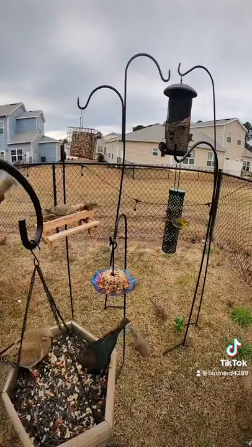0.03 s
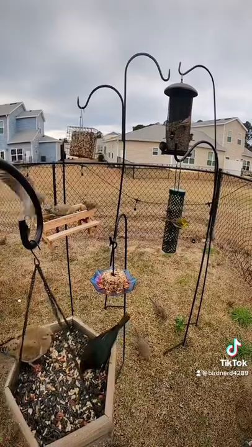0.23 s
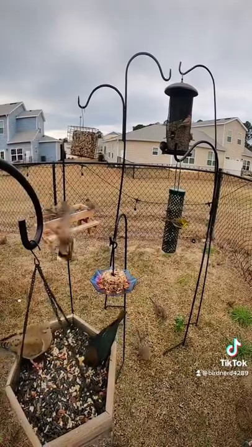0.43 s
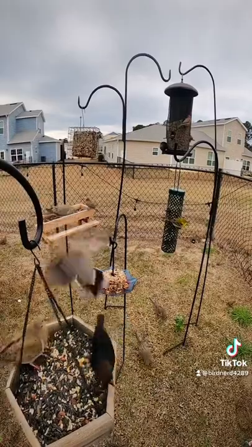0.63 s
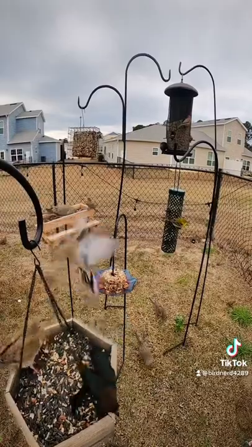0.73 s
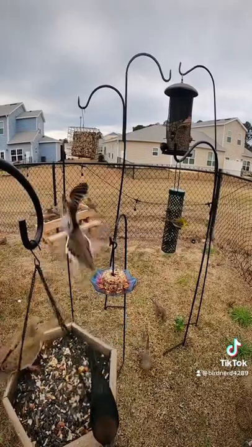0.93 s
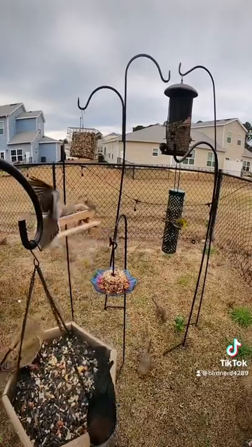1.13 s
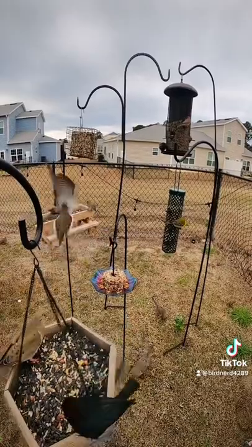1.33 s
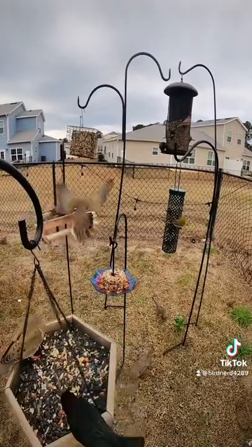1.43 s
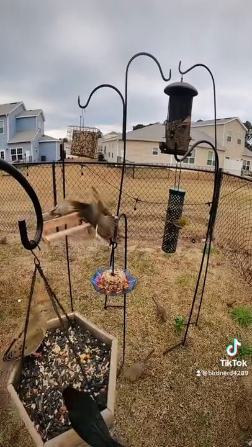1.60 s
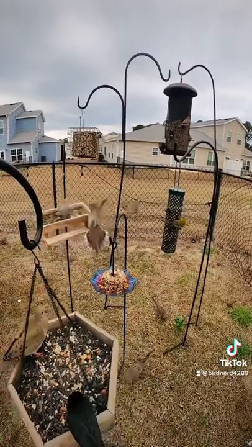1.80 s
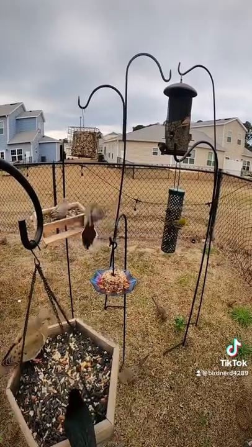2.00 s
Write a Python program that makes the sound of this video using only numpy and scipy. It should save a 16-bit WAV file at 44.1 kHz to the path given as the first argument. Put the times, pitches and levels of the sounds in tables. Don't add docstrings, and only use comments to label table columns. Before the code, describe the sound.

Doves flap close to the microphone at a garden feeder: soft low air puffs, rustling feathers and brief whistles, then sharp wing claps and scratchy claw ticks on wire, over faint distant traffic.

```python
import sys
import numpy as np
from scipy import signal
from scipy.fft import rfft, irfft
from scipy.io import wavfile
from scipy.ndimage import uniform_filter1d

SR = 44100
rng = np.random.default_rng(int(sys.argv[2]) if len(sys.argv) > 2 else 0)


def store_pcm(level_fs):
    pcm = np.round(np.clip(level_fs, -1, 1) * 32767).astype(np.int16)
    wavfile.write(sys.argv[1], SR, np.atleast_2d(pcm).T)


def invert_db(x):
    u = np.asarray(x, float) / 20
    return 10 ** u


N = 90581


def unit(x):
    return x / np.sqrt(np.mean(x ** 2))


def band(x, hz, width_hz):
    centre = min(hz, .45 * SR)
    quality = max(hz / width_hz, .3)
    return signal.lfilter(*signal.iirpeak(centre, quality, fs=SR), x)


def between(x, low_hz, high_hz):
    f = np.fft.rfftfreq(N, 1 / SR)
    return irfft(rfft(x) * (f > low_hz) * (f <= high_hz), N)


def coloured(points, tilt_db=0):
    octave = np.log2(np.maximum(np.fft.rfftfreq(N, 1 / SR), 1))
    hz, db = np.array(points).T
    shape_db = np.interp(octave, np.log2(hz), db, left=-90) + tilt_db * (octave - 11)
    return unit(irfft(rfft(rng.standard_normal(N)) * invert_db(shape_db), N))


def walk(rate):
    k = int(SR / rate)
    steps = np.repeat(rng.standard_normal(N // k + 1), k)
    return unit(uniform_filter1d(uniform_filter1d(steps, k), k)[:N])


def hump(t, start, length, peak):
    u = np.clip((t - start) / length, 0, 1)
    peak = np.clip(peak, .05, .95)
    return np.sin(np.pi / 2 * np.minimum(u / peak, (1 - u) / (1 - peak)))


# (frequency [Hz], density [dB per Hz])
TRAFFIC_SPECTRUM = [(22, 12), (250, -8), (400, -25.5), (740, -24.5), (1200, -19), (1910, -28), (9700, -36),
                    (16000, -35.5)]


def suburb():
    hum = unit(band(rng.standard_normal(N), 135, 14))
    traffic_db = -51.5 + 0.32 * walk(5.5)
    return invert_db(traffic_db) * coloured(TRAFFIC_SPECTRUM) + invert_db(-53) * hum


def voice(t, glide, ratio, db):
    s, hz, level = np.array(glide).T
    pitch = uniform_filter1d(np.interp(t, s, hz), size=60) * ratio * (1 + 0.019 * walk(500))
    phase = 2 * np.pi * np.cumsum(pitch) / SR
    level_db = np.interp(t, s, level, left=-200, right=-200) + db + 2 * walk(400)
    return invert_db(level_db) * (np.sin(phase) + invert_db(-16) * np.sin(2 * phase))


# (time [s], frequency [Hz], level [dB])
CHIRP_GLIDE = [
    (1.941, 3120, -60),
    (1.95, 3420, -57),
    (1.962, 3800, -51.5),
    (1.966, 4350, -49),
    (1.973, 3640, -49.5),
    (1.993, 3580, -54),
    (1.995, 3530, -77),
]
# (time [s], frequency [Hz], level [dB])
PEEP_GLIDE = [
    (0.093, 6160, -82.5),
    (.099, 6900, -54),
    (.108, 7900, -55),
    (.114, 8130, -54),
    (.125, 8200, -82),
]


def small_bird(t):
    chirp = voice(t, CHIRP_GLIDE, 0.99, 0) + voice(t, CHIRP_GLIDE, 1.2, -1.5)
    return chirp + voice(t, PEEP_GLIDE, 0.98, 0)


# (time
# [s], peak level [dB], centre frequency [Hz])
DRY_TICKS = [(0.141, -52, 6000), (0.36, -42, 6400), (0.418, -53, 5500), (0.483, -52, 9500),
             (0.789, -41, 9000), (0.815, -35.5, 10400), (.887, -39.5, 10000), (0.939, -41, 4930),
             (1.339, -51, 4970), (1.373, -39, 4030), (1.453, -37, 6000), (1.795, -39, 9000),
             (1.803, -48, 9500), (1.890, -43.5, 7300), (1.995, -56, 9500)]


def ticks(t):
    air, decay_s = rng.standard_normal(N), 0.0012
    out = np.zeros(N)
    for s, db, hz in DRY_TICKS:
        decay = (t >= s) * np.exp(-np.abs(t - s) / decay_s)
        out += invert_db(db - 1.5) * decay * unit(band(air, hz, 0.37 * hz))
    return out


# (time [s], peak level [dB], level of bright modes [dB], scrape decay [s])
CLAW_HITS = [
    (1.66, -41.5, -1.5, 0.0035),
    (1.684, -40, -7, 0.0047),
    (1.711, -40.5, -7, 0.0051),
    (1.751, -50, 1, 0.0054),
    (1.754, -51.5, 11.5, .004),
    (1.762, -47, 15, .004),
    (1.801, -46, -4, 0.0036),
    (1.845, -54, 8.5, 0.0024),
    (1.997, -36, -5, .002),
]
# (frequency [Hz], level [dB], decay by 60 dB [s])
BASKET_MODES = [(2550, -4, .016), (3950, -1, .022), (5830, -6, .013), (7590, -12, .01), (8490, -3, .012),
                (10500, -9, .009)]


def wire(t):
    out, air = np.zeros(N), rng.standard_normal(N)
    spots = rng.standard_normal((len(CLAW_HITS), len(BASKET_MODES), 2))
    for (s, db, bright_db, scrape_s), spot in zip(CLAW_HITS, spots):
        i = slice(int(s * SR), int((s + .08) * SR))
        push = invert_db(db) * np.exp(-(t[i] - s) / scrape_s) * air[i]
        for (hz, mode_db, t60), (detune, weight) in zip(BASKET_MODES, spot):
            turn = 2j * np.pi * hz * (1 + 0.016 * detune) / SR
            pole = np.exp(turn - np.log(1000) / (t60 * SR))
            ring = invert_db(mode_db - 26 + 2 * weight) * signal.lfilter([1], [1, -pole], push).imag
            scratch = invert_db(-4.5) * band(push, hz, 1600)
            out[i] += invert_db(bright_db * (hz > 5000)) * (ring + scratch)
    return out


# (time [s], peak level [dB], centre frequency [Hz])
WING_CLAPS = [(0.08, -38, 1730), (0.188, -46, 3000), (.275, -40.5, 1490), (1.098, -53, 3000),
              (1.126, -49, 1090), (0.761, -29, 154), (.852, -35, 405), (.741, -34, 2980),
              (0.773, -38, 2580), (0.849, -44, 1970), (1.3808, -23, 1750), (1.4618, -26, 1800),
              (1.5325, -21.5, 1700), (1.607, -35, 2400), (1.428, -47, 1320), (1.485, -44, 1490),
              (1.521, -43, 1730), (1.562, -38.5, 1190), (1.567, -33.5, 298), (1.6007, -45.5, 1840),
              (1.634, -36, 280), (1.643, -40, 400), (1.681, -36.5, 1420), (1.692, -38.5, 1010),
              (1.707, -36.5, 1690), (1.715, -37.5, 346), (1.724, -47, 1200), (1.698, -42.5, 218),
              (1.729, -42, 250)]


def claps(t):
    clap_s, after_s, after_db = 0.0013, 0.006, -10
    out = np.zeros(N)
    air, hiss = (rng.standard_normal(N) * invert_db(5.5 * walk(2500)) for _ in range(2))
    top = unit(band(hiss, 4000, 12000))
    cups = rng.uniform(0.74, 1.024, (len(WING_CLAPS), 2))
    for (s, db, hz), (low_cup, high_cup) in zip(WING_CLAPS, cups):
        body = band(air, hz, hz)
        body += 1.25 * band(air, hz * low_cup, 0.23 * hz)
        body -= 0.52 * band(air, 2.67 * hz * high_cup, 0.19 * hz)
        body = unit(body)
        high = invert_db(-5) * min(hz / 1900, 1) ** 2 * top
        first = np.exp(-np.abs(t - s) / clap_s)
        second = invert_db(after_db) * np.exp(-np.abs(t - s - after_s) / (1.5 * clap_s))
        out += invert_db(db - 3) * (first * (body + high) + second * (body + 0.57 * high))
    return out


# (frequency [Hz], density [dB per Hz])
FEATHER_SPECTRUM = [(150, -9), (350, -21.5), (745, -24.5), (1720, -21), (6640, -37), (8800, -34.5),
                    (13200, -53), (16000, -74)]
# (start [s], length [s], level [dB], tilt [dB per octave])
STROKE_RUSTLES = [(-.02, 0.1, -56.5, 1), (0.064, 0.074, -49.5, -1), (0.133, 0.071, -49.5, -0.5),
                  (0.218, 0.07, -54, 1.5), (0.363, 0.066, -51.5, 2), (0.427, 0.088, -49, -0.5),
                  (0.518, 0.094, -52, 0), (0.61, 0.1, -55, 2), (0.698, 0.091, -42, -1),
                  (0.768, 0.074, -43.5, -1), (0.837, 0.093, -44.5, -1), (0.932, 0.071, -55, 2.5),
                  (1.007, 0.031, -60, 1), (1.045, 0.075, -60.5, 3), (1.16, 0.074, -58.5, 2.5),
                  (1.254, 0.078, -63, 5), (1.331, 0.04, -54.5, 2.5), (1.384, 0.055, -56, 2.5),
                  (1.435, 0.094, -45.5, -2), (1.514, 0.072, -42, -3), (1.591, 0.062, -45, -3.5),
                  (1.657, 0.053, -48, -2.5), (1.709, 0.042, -49, -0.5), (1.737, 0.06, -59, -0.5),
                  (1.789, 0.014, -64, 3), (1.84, 0.018, -66, 1.5)]


def rustle(t):
    dark, bright = coloured(FEATHER_SPECTRUM, -3), coloured(FEATHER_SPECTRUM, 1.85)
    dark *= invert_db(3 * walk(220))
    bright *= invert_db(3 * walk(300))
    wind_hz = 40
    wind = unit(band(band(rng.standard_normal(N), wind_hz, 76), wind_hz, 89))
    out = np.zeros(N)
    for s, length, db, tilt in STROKE_RUSTLES:
        swell = invert_db(db) * hump(t, s, length * 1.342, 0.19) ** 1.305
        noise = invert_db(-2 * tilt - 9.5) * dark + invert_db(2 * tilt - 4) * bright
        out += swell * (noise + invert_db(3) * wind)
    return out


# (start [s], length [s], level [dB], pitch [Hz], moment of the peak [0-1])
FEATHER_WHISTLES = [(-.02, 0.054, -43.5, 2600, 0.46), (-.012, .036, -42.5, 2350, 0.43),
                    (.078, 0.037, -42, 2693, 0.02), (0.153, 0.034, -49.5, 2560, 0.18),
                    (0.234, 0.04, -48.5, 2336, .3), (0.255, 0.021, -58, 1550, 0.45),
                    (.358, 0.0092, -48.5, 1400, 0.56), (.359, 0.029, -41.5, 2560, .72),
                    (0.387, 0.0086, -47, 2050, 0.1), (0.443, .01, -46, 1410, 0.59),
                    (.446, 0.033, -41.5, 2610, 0.56), (.534, 0.021, -52, 1430, .5),
                    (0.537, 0.018, -47, 2425, 0.67), (0.543, .019, -46, 2005, .7),
                    (0.626, 0.011, -51.5, 1740, 0.1), (0.64, 0.013, -51, 1910, 0.52),
                    (0.658, .01, -52, 1355, 0.5), (.709, 0.0095, -34.5, 3030, 0.3),
                    (0.705, 0.016, -40, 2600, 0.5), (.718, 0.017, -32, 2780, 0.51),
                    (0.735, 0.0075, -45, 2000, 0.44), (.786, 0.0235, -33, 2727, 0.45),
                    (0.817, 0.018, -49, 3220, 0.34), (.822, 0.018, -44, 1496, 0.24),
                    (0.859, 0.011, -44.5, 2606, 0.35), (0.869, 0.0185, -40.5, 2440, 0.52),
                    (.949, 0.041, -42.5, 2460, 0.61), (1.053, 0.011, -51, 2230, 0.45),
                    (1.067, 0.024, -44.5, 2444, 0.56), (1.167, 0.034, -40.5, 2522, 0.73),
                    (1.265, 0.023, -54, 1450, .4), (1.276, 0.027, -42.5, 2480, 0.52),
                    (1.347, 0.016, -46, 2175, 0.5), (1.367, 0.011, -48, 2355, 0.64),
                    (1.435, .012, -56, 2130, 0.46), (1.603, 0.012, -46.5, 2414, 0.58)]


def whistles(t):
    sag, pair_hz, second_db, overtones_db = .1, 130, -8, (-12, -22, -34)
    out, wobble, flutter, air = np.zeros(N), walk(250), walk(300), rng.standard_normal(N)
    for s, length, db, hz, peak in FEATHER_WHISTLES:
        i = slice(max(int(s * SR), 0), int((s + length) * SR))
        speed = hump(t[i], s, length, peak)
        pitch = hz * (1 - sag * np.arccos(np.clip(speed, 0, 1)) ** 1.38 + .009 * wobble[i])
        first = 2 * np.pi * np.cumsum(pitch) / SR
        second = 2 * np.pi * np.cumsum(pitch - pair_hz) / SR
        tone = np.sin(first) + invert_db(second_db) * np.sin(second)
        richness = speed * min(length / .025, 1) ** 2
        for harmonic, overtone_db in enumerate(overtones_db, 2):
            tone += invert_db(overtone_db) * richness * np.sin(harmonic * first)
        breath = unit(band(band(air[i], hz * 0.97, 440), hz * 0.97, 450))
        loudness = invert_db(db + 3 * flutter[i]) * speed ** 1.13
        out[i] += loudness * (tone + invert_db(-12) * breath)
    return out


# (time of the deepest dip [s], peak level [dB])
AIR_PUFFS = [(.008, -39), (.028, -36.5), (.199, -32.5), (.377, -37), (0.463, -32), (0.529, -33.5),
             (.597, -34), (0.672, -34.5), (.82, -31), (.871, -27), (.954, -33), (1.061, -36),
             (1.165, -36.5), (1.352, -37), (1.412, -35), (1.469, -32.5), (1.565, -35), (1.594, -34.5),
             (.068, -30.5), (0.106, -24.5), (.147, -26.5), (0.181, -28), (0.265, -34), (0.398, -28),
             (0.438, -29), (0.484, -29.5), (0.565, -21), (0.612, -28.5), (0.654, -23.5), (0.704, -26),
             (0.73, -21), (.748, -22), (0.774, -20.5), (0.799, -25.5), (0.851, -24.5), (0.894, -28.5),
             (0.99, -29), (1.093, -31), (1.204, -26.5), (1.302, -31), (1.39, -32.5), (1.439, -34.5),
             (1.516, -30.5), (1.547, -33), (1.623, -27), (1.666, -32), (1.697, -34), (1.735, -33)]


def puffs(t):
    cycles, swing_hz = 0.3, 48.05
    out = np.zeros(N)
    for s, db in AIR_PUFFS:
        window = np.exp(-.5 * ((t - s) * swing_hz / cycles) ** 2)
        out -= invert_db(db) * window * np.cos(2 * np.pi * swing_hz * (t - s) + 0.37)
    return out


def scene():
    t = np.arange(N) / SR
    bird = small_bird(t)
    wings = puffs(t) + whistles(t) + rustle(t) + claps(t)
    contacts = ticks(t) + wire(t)
    mono = wings + contacts + bird + suburb()
    return np.array([mono, mono])


# (start [s], length [s], lowest frequency [Hz])
CHANNEL_PARTINGS = [(.05, .03, 4200), (.165, .055, 2500), (.395, .035, 4200), (.72, .06, 4200),
                    (.93, .035, 3700), (1.05, .055, 4200), (1.35, .03, 4000), (1.455, .012, 3500),
                    (1.527, .01, 3500), (1.585, .05, 2600), (1.65, .035, 3500), (1.74, .04, 2400),
                    (1.82, .045, 3800), (1.885, .012, 2700), (1.975, .04, 2500)]


def channel_difference(x):
    split_hz, top_hz = 11800, 14600
    top = between(x, split_hz, SR)
    side = between(invert_db(-6) * top * walk(1100), split_hz, top_hz) - .28 * top
    t, drift = np.arange(N) / SR, invert_db(-15) * walk(1200)
    for s, length, low_hz in CHANNEL_PARTINGS:
        side += hump(t, s, length, .5) ** .5 * between(drift * x, low_hz, split_hz)
    return side


def top_cut(x):
    return signal.sosfilt(signal.butter(12, 16320, fs=SR, output="sos"), x)


def record(dry):
    x = dry[0] - 0.43 * band(dry[0], 7440, 1620)
    x = signal.sosfilt(signal.butter(3, 12200, fs=SR, output="sos"), x)
    x = signal.sosfilt(signal.butter(10, 14600, fs=SR, output="sos"), x)
    mix = x + channel_difference(x) * np.array([[1], [-1]])
    return top_cut(mix)


dry = scene()
out = record(dry)
store_pcm(out)
```